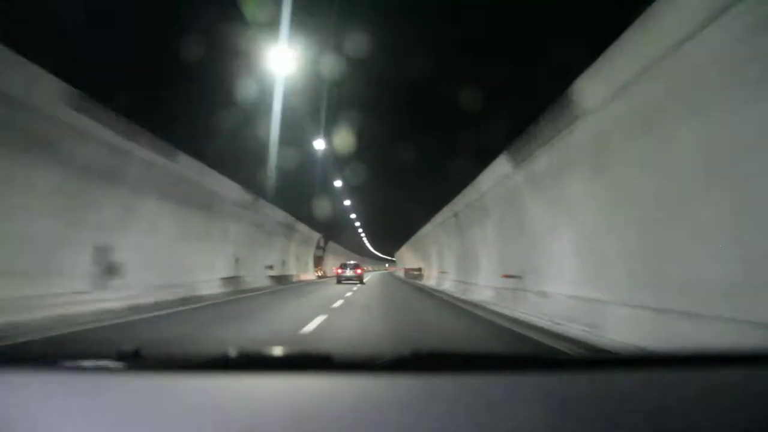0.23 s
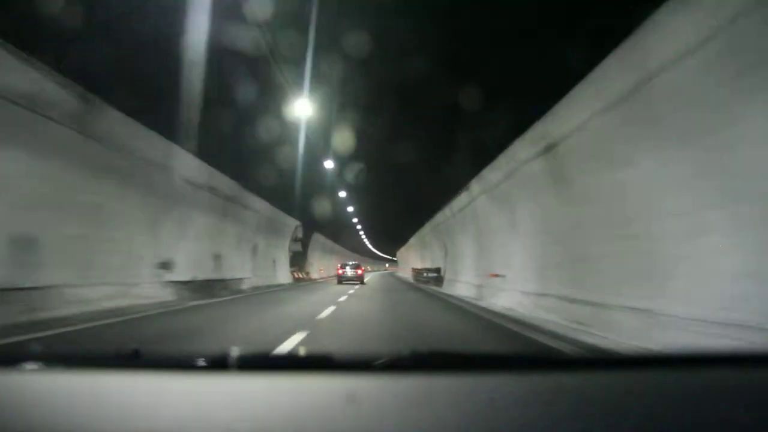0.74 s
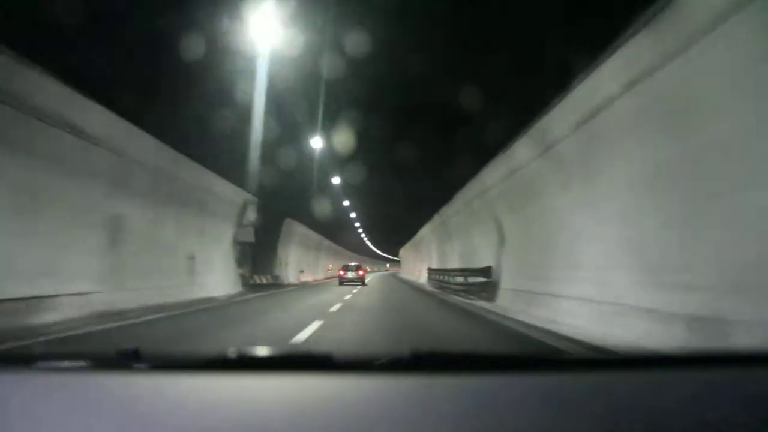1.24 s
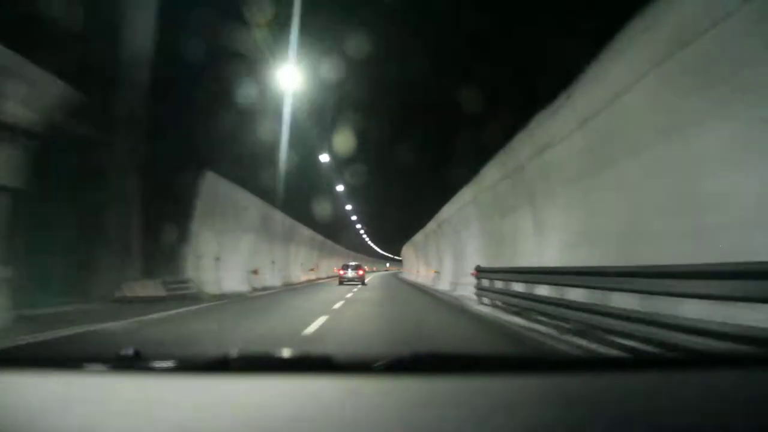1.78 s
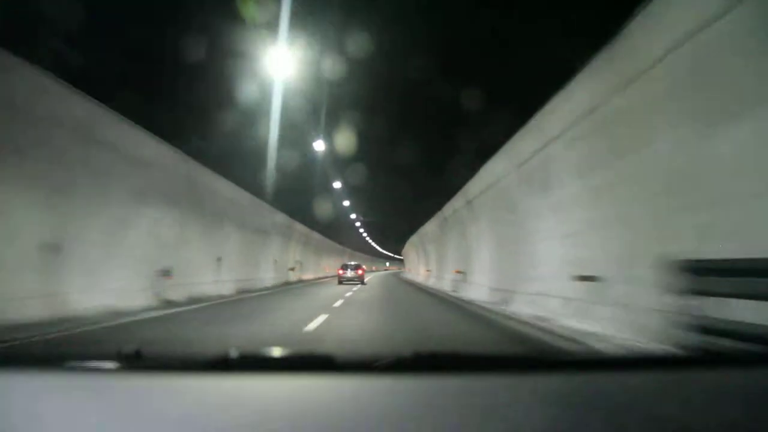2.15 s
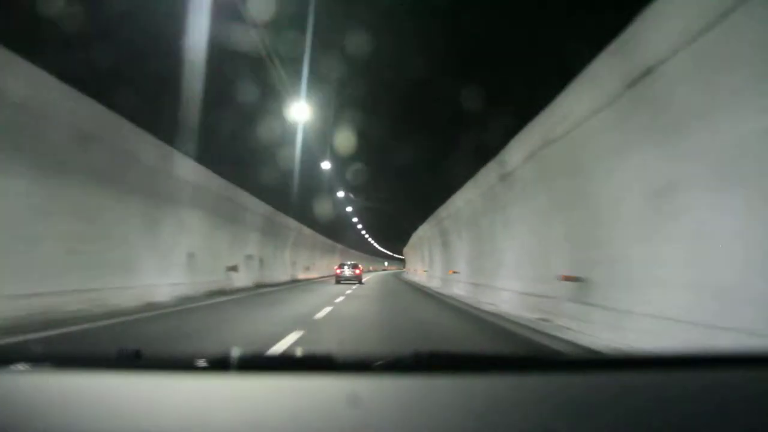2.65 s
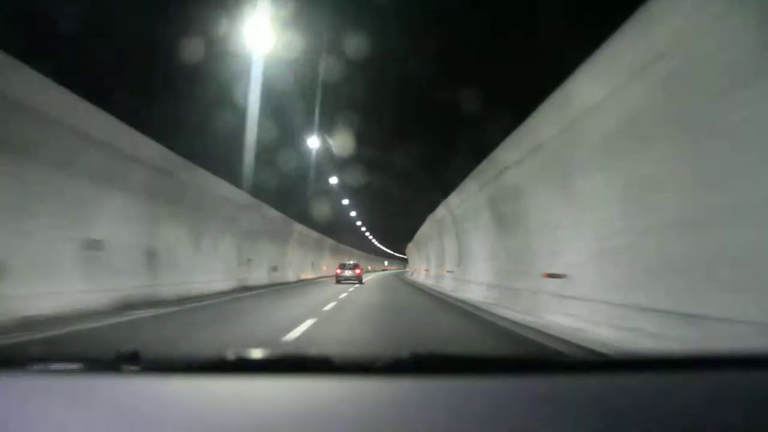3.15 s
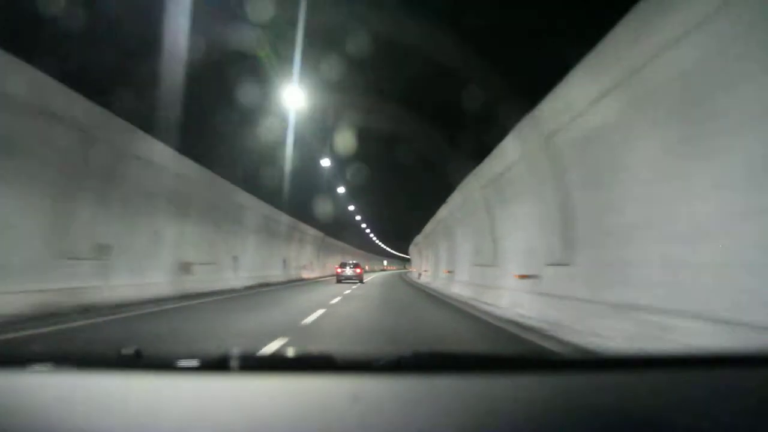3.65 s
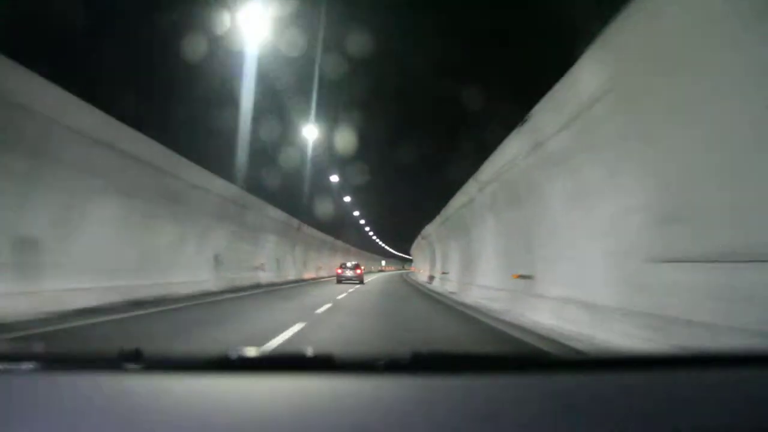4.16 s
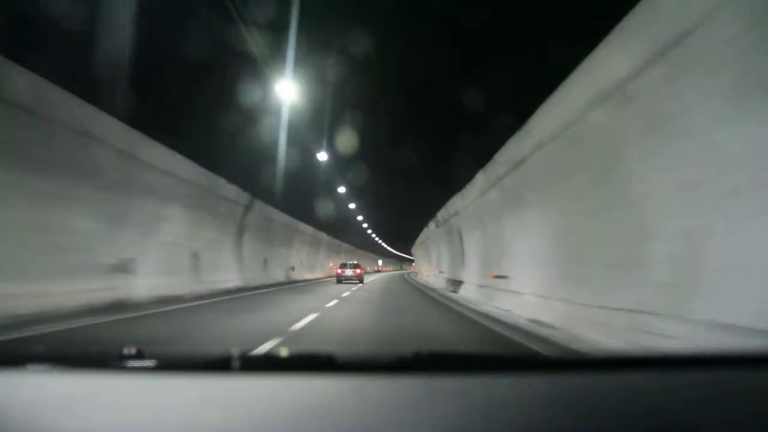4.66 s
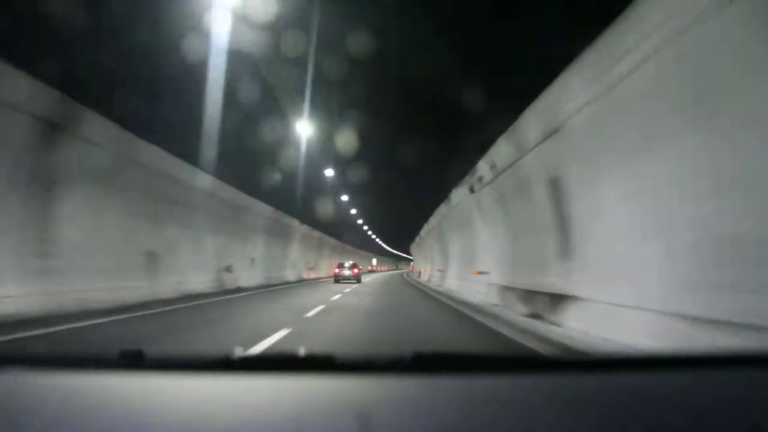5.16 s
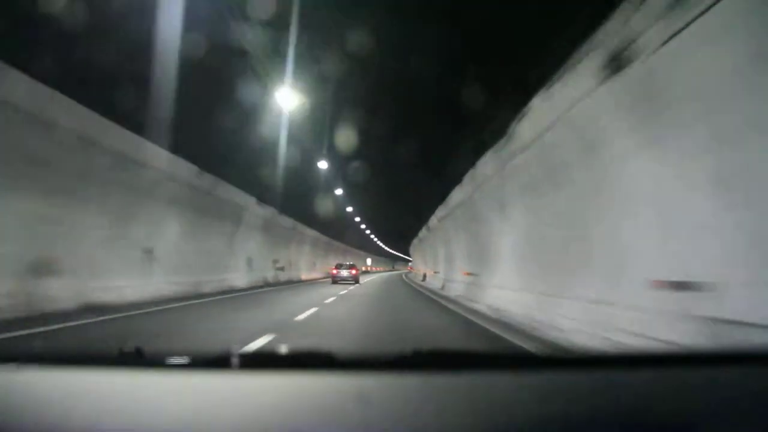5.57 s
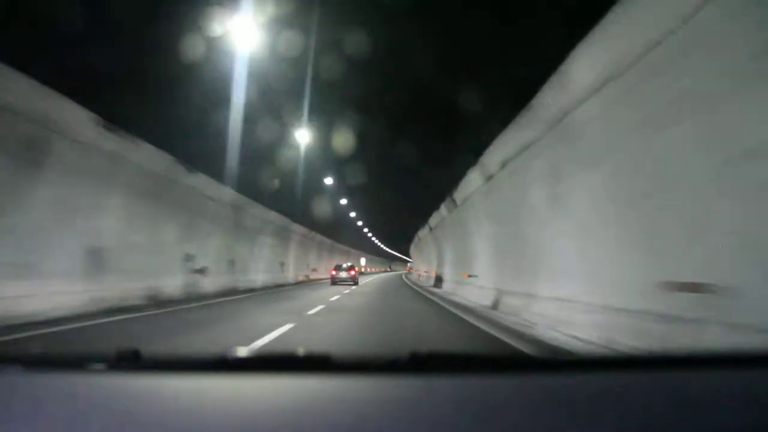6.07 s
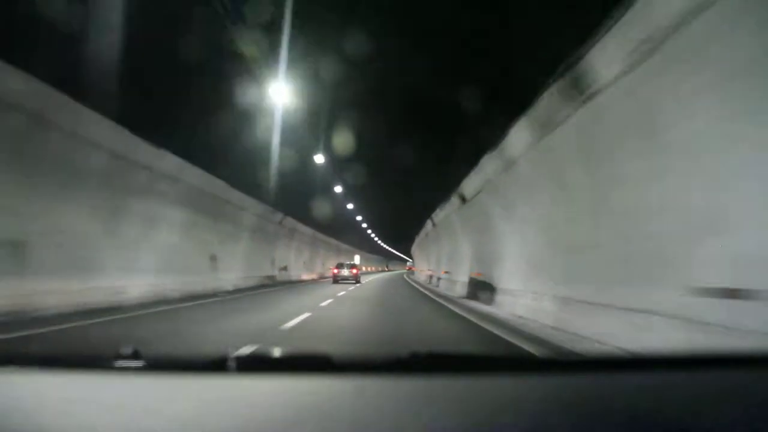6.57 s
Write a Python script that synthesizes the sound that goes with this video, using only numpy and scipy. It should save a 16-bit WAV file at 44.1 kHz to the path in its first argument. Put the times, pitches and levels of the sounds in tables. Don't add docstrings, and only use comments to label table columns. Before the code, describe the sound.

Continuous motorway tunnel drive from within the closed cabin, the microphone near the windscreen. Low booming road shake and a droning engine sit under dense mid-pitched tyre roar. The hiss flutters quickly with the wheels and shifts briefly as wall recesses and joints pass. A few muffled suspension thuds and tiny stone clicks appear. Later the surface coarsens and the tyres grow brighter, then everything cuts off.

```python
import sys
import numpy as np
from scipy import signal
from scipy.fft import rfft, irfft
from scipy.io import wavfile
from scipy.ndimage import uniform_filter1d

SR = 44100
rng = np.random.default_rng(int(sys.argv[2]) if len(sys.argv) > 2 else 0)


def to_wav(s):
    ch = np.atleast_2d(s).T
    pcm = np.round(np.clip(ch, -1, 1) * 32767)
    wavfile.write(sys.argv[1], SR, pcm.astype(np.int16))


def decibels_to_gain(level_db):
    exponent = np.asarray(level_db, float) / 20
    return 10 ** exponent


N = 301203
HOP, SIZE = 512, 2048

# (time [s], level [dB])
GAIN = [(0, -53.5), (.62, -53.5), (.75, -53), (1.18, -53), (1.7, -55.5), (1.95, -53), (2.22, -55.5),
        (2.5, -52.5), (2.75, -55), (3.15, -52.5), (3.52, -55.5), (4.2, -55.5), (4.85, -53.5), (5.05, -52.5),
        (5.45, -55), (5.78, -53), (6.1, -54), (6.6, -53.5)]


def evened(x):
    return x / np.sqrt(np.mean(x ** 2) + 1e-20)


def smoothed(x, samples):
    return uniform_filter1d(uniform_filter1d(x, int(samples)), int(samples))


def wobble(samples):
    return evened(smoothed(rng.standard_normal(N), samples))


def steadied(x, samples):
    return x / np.sqrt(smoothed(x ** 2, samples) + 1e-9)


def column(rows, index):
    rows = np.array(rows)
    return np.interp(np.arange(N) / SR, rows[:, 0], rows[:, index])


def tone(hz, waver_hz):
    return np.sqrt(2) * np.sin(2 * np.pi * np.cumsum(hz + waver_hz * wobble(6000)) / SR)


def shaped(points, patchy_db):
    hz = np.fft.rfftfreq(SIZE, 1 / SR)
    f, db = np.transpose(points)
    a, b, patches = rng.standard_normal((N // HOP + SIZE // HOP, len(hz), 3)).T
    patches = uniform_filter1d(patches, size=20, axis=0)
    patches = evened(uniform_filter1d(patches, size=8, axis=1))
    colour_db = np.interp(np.log(hz + 1), np.log(f + 1), db, left=-200, right=-200)
    z = (a + 1j * b) * decibels_to_gain(colour_db[:, None] + patchy_db * patches)
    return evened(signal.istft(z, nperseg=SIZE, noverlap=SIZE - HOP)[1][:N])


def resonate(x, hz, width):
    turn = np.exp(2j * np.pi * hz * np.arange(N) / SR)
    r = np.exp(-np.pi * width / SR)
    once = signal.lfilter([1 - r], [1, -r], x / turn)
    twice = signal.lfilter([1 - r], [1, -r], once)
    return 2 * (turn * twice).real


def modes(table):
    return evened(sum(decibels_to_gain(db) * resonate(rng.standard_normal(N), hz, width) for hz, width, db in table))


def riding_db():
    gain_db = column(GAIN, index=1)
    return gain_db - gain_db.mean()


def wall_db(index):
    # (time [s], half length [s], roar change [dB], hiss change [dB])
    wall_marks = [(0.125, .05, -0.5, 1.5), (0.617, .05, -1, -1.5), (1.151, .08, 0, 1.5),
                  (1.505, 0.055, -1, 1.5), (1.8, 0.055, -1, -0.5), (2.054, .07, 1, 1),
                  (2.199, .07, -1.5, 0.5), (2.4, .04, -1.5, -1.5), (2.737, .05, 0.5, 2),
                  (2.91, 0.1, -2.5, 1), (3.024, 0.051, 2, 2), (3.37, .05, 1, 1), (3.7, 0.33, 1.5, 1.5),
                  (4.2, 0.2, 1, 3), (4.49, 0.036, 1.5, 2.5), (4.845, .05, -3, -1), (5.23, 0.074, 0, 0.8),
                  (5.401, .06, -2.5, -0.5), (5.73, .04, 0.5, 1.5), (6.43, .06, 0.5, 1.5),
                  (6.524, 0.033, 0.5, -1.5), (6.612, .06, 1, 1)]
    t = np.arange(0, N, HOP) / SR
    rows = np.transpose(wall_marks)[:, :, None]
    passing = np.exp(-((t - rows[0]) / rows[1]) ** 2)
    return np.interp(np.arange(N) / SR, t, (rows[index] * passing).sum(axis=0))


def swells_db(rows, hz, rise_s, fall_s):
    t = np.arange(0, N, HOP) / SR
    s, db, struck_hz = np.transpose(rows)[:, :, None]
    late = (t - s) / np.where(t < s, rise_s, fall_s)
    reach = np.exp(-(np.log2(hz / struck_hz) / 0.34) ** 2)
    return np.interp(np.arange(N) / SR, t, (db * reach * np.exp(-late ** 2)).sum(axis=0))


def bumps_db(hz):
    # (time [s], swell [dB], pitch of the body part struck [Hz])
    bumps = [(0.429, 4, 210), (0.57, 5, 110), (0.82, 2.5, 210), (0.9, 3.0, 330), (0.95, 6, 110),
             (1.31, 1, 110), (1.73, 4, 110), (1.98, 5.5, 110), (2.32, 2.5, 210), (2.33, 3.5, 110),
             (2.56, 7.5, 330), (3.14, 3.5, 210), (3.2, 4.5, 330), (3.21, 4.5, 110), (3.45, 7.5, 330),
             (4.06, 3, 110), (4.4, 0, 110), (4.76, 6.5, 110), (5.07, 2, 210), (5.2, 3.0, 210),
             (5.24, 2.5, 330), (5.43, 2, 110), (5.75, -1.5, 330), (5.88, 1.5, 110), (5.98, 4.5, 330),
             (6.17, 3.0, 330), (6.46, 4.5, 210), (6.58, 3, 110), (6.61, 2, 210), (6.7, 5.5, 330)]
    # (time [s], dip [dB], pitch of the body part that calms [Hz])
    lulls = [(.34, -5.5, 110), (.37, -1, 210), (.61, -1.5, 210), (.66, -9, 330), (.66, -2.5, 110),
             (1.08, -2, 210), (1.5, -1, 190), (1.78, -5.5, 210), (2.22, -7, 298), (2.75, -4.5, 282),
             (3.08, -3, 330), (3.56, -4, 330), (4.0, -1.5, 200), (4.5, -8, 330), (4.92, -6, 330),
             (5.36, -2.5, 210), (6.1, -5, 110), (6.48, -7, 330), (6.67, -3.5, 110)]
    swell_db = swells_db(bumps, hz, rise_s=0.038, fall_s=0.028)
    return swell_db + swells_db(lulls, hz, rise_s=0.039, fall_s=0.039)


def camera_whine():
    # (frequency [Hz], level [dB per Hz])
    skirt = [(13600, -10), (13850, -17.5), (14130, -8), (14400, -17), (15050, -3.5), (15300, -7.5),
             (15600, -5.5), (15700, 2)]
    whine = decibels_to_gain(4.5 + 0.4 * wobble(300) + 0.5 * wobble(80)) * tone(15658.5, waver_hz=0.2)
    return whine + decibels_to_gain(-19.0) * shaped(skirt, patchy_db=-1.5)


def gear_whirrs():
    # (frequency [Hz], level [dB])
    gears = [(1045, -46), (1887, -69), (1972, -63.5), (2090, -69)]
    return sum(decibels_to_gain(db + 2.5 * wobble(5000)) * tone(hz, waver_hz=3.0) for hz, db in gears)


def grit():
    # (time [s], level [dB])
    ticks = [(0.9714, -50), (1.5853, -49), (2.0218, -46), (2.7252, -48), (3.1794, -51), (4.2834, -50),
             (5.7204, -48), (5.7354, -49), (6.5724, -49), (6.6104, -48)]
    hits = np.zeros(N)
    for s, db in ticks:
        hits[round(s * SR)] = decibels_to_gain(db + 3.0)
    sprinkle = rng.random(N) < 40 / SR
    hits += decibels_to_gain(-74 + 4.0 * np.minimum(rng.exponential(1, N), 3)) * sprinkle
    t = np.arange(400) / SR
    burst = (t == 0) + 0.22 * rng.standard_normal(len(t)) * np.exp(-t / 0.003)
    band = signal.butter(2, [3500 / SR * 2, 13500 / SR * 2], "bandpass")
    burst = signal.lfilter(*band, burst)
    return signal.oaconvolve(hits, burst / abs(burst).max())[:N]


def thuds():
    # (time [s], peak [dB], ring [Hz], t60 [s])
    joints = [
        (0.47, -15, 200, .07),
        (3.7, -7.5, 105, .14),
        (2.7, -10, 270, .06),
    ]
    out = np.zeros(N)
    for s, db, hz, t60 in joints:
        t = np.maximum(np.arange(N) / SR - s, 0)
        swell = 1 - np.exp(-t / 0.006)
        out += decibels_to_gain(db - 60 * t / t60) * swell * np.sin(2 * np.pi * hz * t)
    return out


def tyres():
    # (frequency [Hz], level [dB per Hz])
    roar_spectrum = [(220, -27.5), (380, -5.5), (405, -3), (517, -6.5), (608, -4), (679, -7.5), (846, -9.5),
                     (1060, -17.5), (1210, -24.5), (1380, -26.5), (1520, -39), (1980, -63), (3340, -120)]
    # (frequency [Hz], level [dB per Hz])
    hiss_spectrum = [(1400, -18.5), (1450, -10), (1510, -6), (1650, -1), (1800, -5.5), (2400, -3),
                     (3000, -3), (3500, -5.5), (4100, -8), (4500, -13.5), (5000, -17), (5600, -32)]
    # (frequency [Hz], level [dB per Hz])
    fizz_spectrum = [(4600, -10.5), (5300, 0), (6100, -3), (6700, -4), (8200, -10), (11000, -10.5),
                     (11600, -14), (13600, -11.5)]
    t = np.arange(N) / SR
    ride_db = riding_db()

    roar_db = 32 - 0.27 * ride_db + wall_db(index=2)
    roar = decibels_to_gain(roar_db) * steadied(shaped(roar_spectrum, patchy_db=0.5), samples=8700)

    turn = 2 * np.pi * 18 * t
    beat_db = 0.55 * np.cos(turn) + 0.35 * np.cos(2 * turn) + 0.4 * np.cos(3 * turn)
    flicker_db = beat_db + 0.24 * wobble(620) + 0.41 * wobble(54) + wall_db(index=3)

    singing = evened(resonate(rng.standard_normal(N), hz=3440, width=290))
    hiss = shaped(hiss_spectrum, patchy_db=0.44) + decibels_to_gain(-11.5) * singing
    hiss_db = 8.5 + 0.25 * ride_db + 1.5 * np.maximum(t - 4.36, 0) + flicker_db
    fizz_db = -8 + 0.05 * ride_db + 0.78 * np.maximum(t - 2.8, 0) + 1.1 * flicker_db
    fizz = shaped(fizz_spectrum, patchy_db=-0.6)
    return roar + decibels_to_gain(hiss_db) * hiss + decibels_to_gain(fizz_db) * fizz


def cabin():
    # (frequency [Hz], width [Hz], level [dB])
    air_modes = [(168.6, 40, -6), (190.3, 12.4, -3.5), (213.7, 20.3, -4), (232.9, 20.5, -8),
                 (246.2, 11.3, -2)]
    # (frequency [Hz], width [Hz], level [dB])
    panel_modes = [(308.5, 21.8, 0), (323.2, 20.5, -0.5), (354, 36.7, 2.5)]
    # (frequency [Hz], width [Hz], level [dB])
    drone_modes = [(46.2, 16, -16), (80.8, 28, -2.5), (110.2, 16, -0.5), (122.7, 30.6, 3)]
    # (frequency [Hz], level [dB per Hz])
    pan_spectrum = [(12, -51), (20, -13), (118, -2.5), (224, -0.5), (290, -0.5), (380, -35), (640, -120)]
    # (time [s], level [dB])
    load = [(0, -21), (.33, -23), (.5, -24.5), (.7, -28.5), (.95, -21), (1.4, -21.5), (2.3, -20),
            (3.05, -23.5), (3.25, -18.5), (3.8, -25.5), (4.3, -19), (4.9, -27), (5.4, -17.5), (5.65, -25),
            (5.9, -21.5), (6.12, -21.5), (6.4, -20), (6.83, -17)]
    ride_db = riding_db()

    air = steadied(modes(air_modes) + decibels_to_gain(-1.0) * shaped(pan_spectrum, patchy_db=2.2), samples=5800)
    air = decibels_to_gain(37 - 0.4 * ride_db + bumps_db(hz=210)) * air
    panels = steadied(modes(panel_modes), samples=4900)
    panels = decibels_to_gain(32 - 0.5 * ride_db + bumps_db(hz=330)) * panels

    load_db = column(load, index=1)
    firing_db = -2.5 + 0.8 * (load_db - load_db.mean())
    engine = decibels_to_gain(firing_db) * tone(111.6, waver_hz=0.87)
    drone = steadied(modes(drone_modes) + engine, samples=4500)
    drone = decibels_to_gain(load_db - column(GAIN, index=1) + bumps_db(hz=110)) * drone
    return air + panels + drone


def scene():
    mean_db = column(GAIN, index=1).mean()
    faint = gear_whirrs() + grit() + thuds()
    return (camera_whine() + decibels_to_gain(-mean_db) * faint + tyres() + cabin())[None]


def roll_off(x):
    return signal.sosfilt(signal.butter(12, 15725, fs=SR, output="sos"), x)


def record(dry):
    x = dry * decibels_to_gain(column(GAIN, index=1))
    x = x - 0.028 * (x ** 2 - np.mean(x ** 2))
    x = x / (1 + (x / 0.95) ** 6) ** (1 / 6)
    hz = np.fft.rfftfreq(2 * N, 1 / SR)
    mic = (hz < 15725) * hz ** 2 / (hz ** 2 + 23.7 ** 2)
    x = irfft(rfft(x, 2 * N) * mic)[:, :N]
    x = x * np.minimum(np.arange(N)[::-1] / (0.0019 * SR), 1)
    return roll_off(x)


dry = scene()
out = record(dry)
to_wav(out)
```